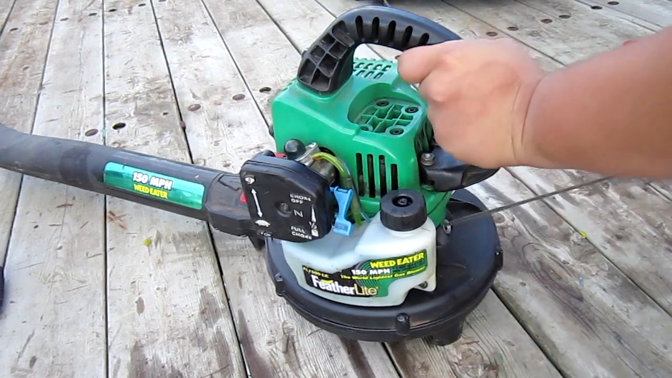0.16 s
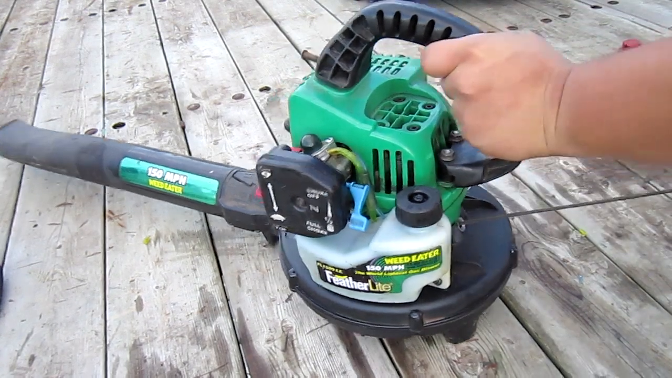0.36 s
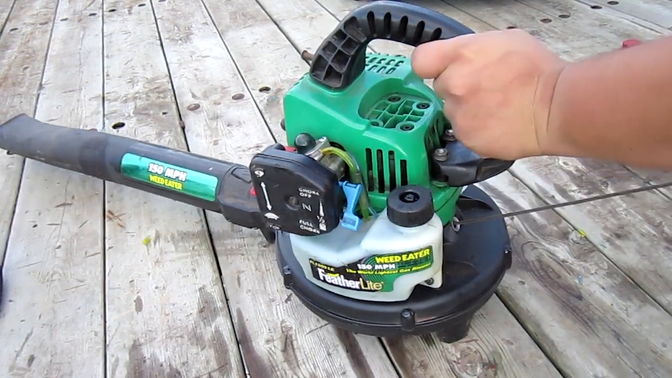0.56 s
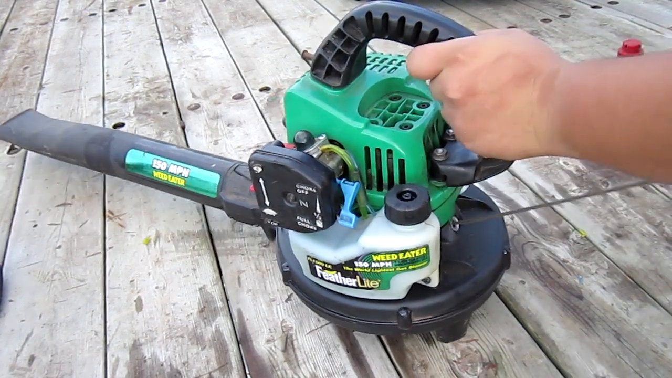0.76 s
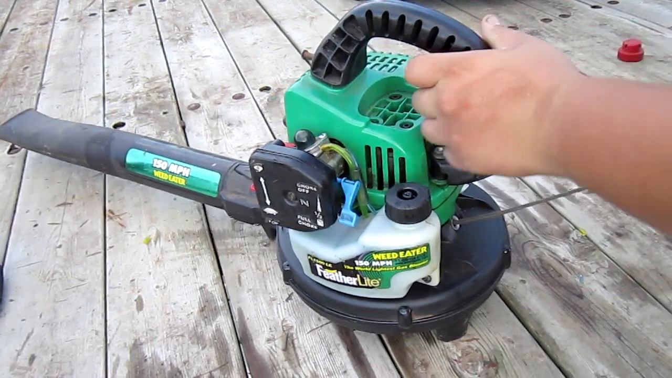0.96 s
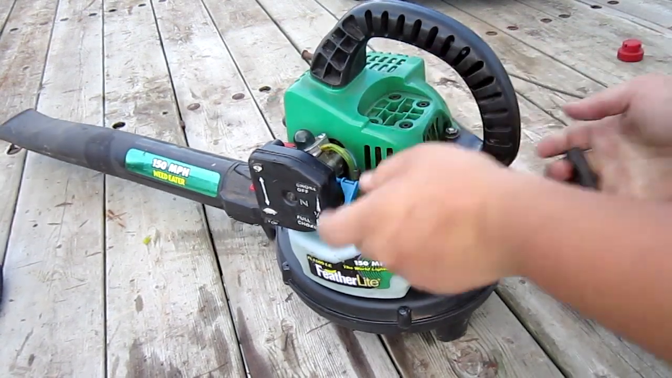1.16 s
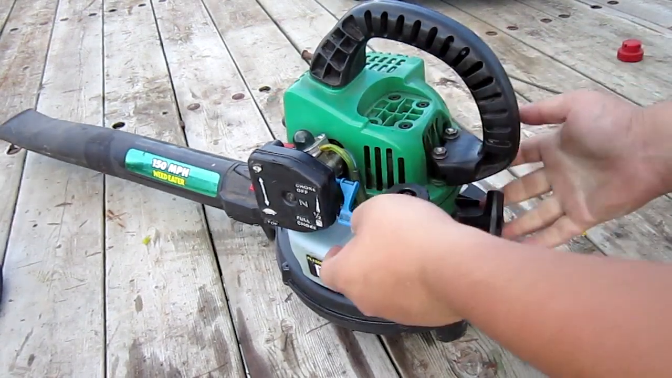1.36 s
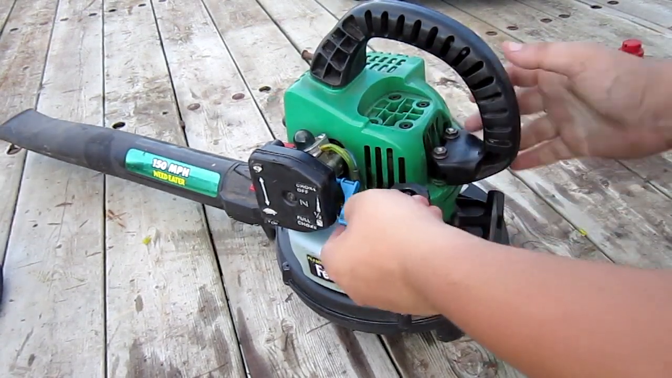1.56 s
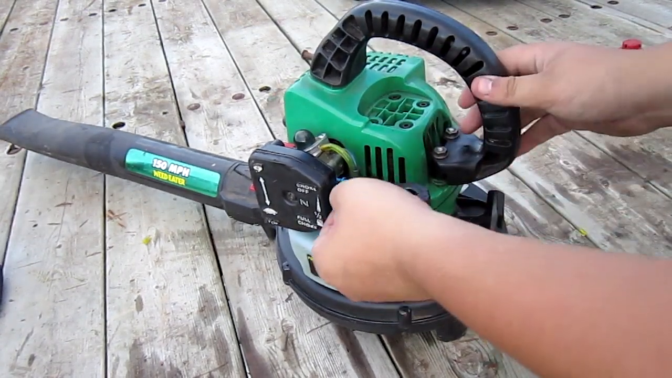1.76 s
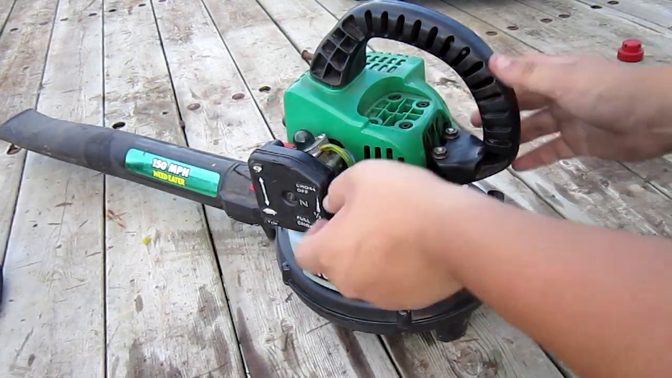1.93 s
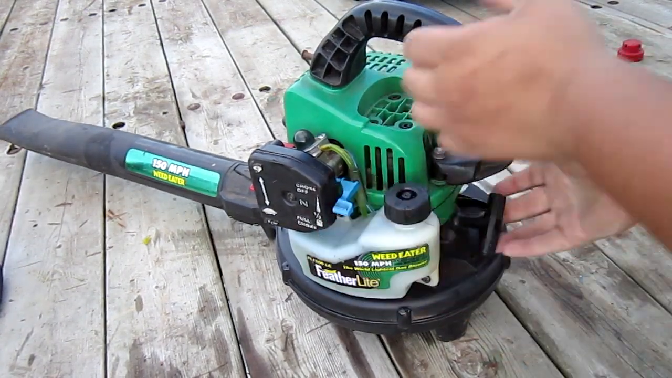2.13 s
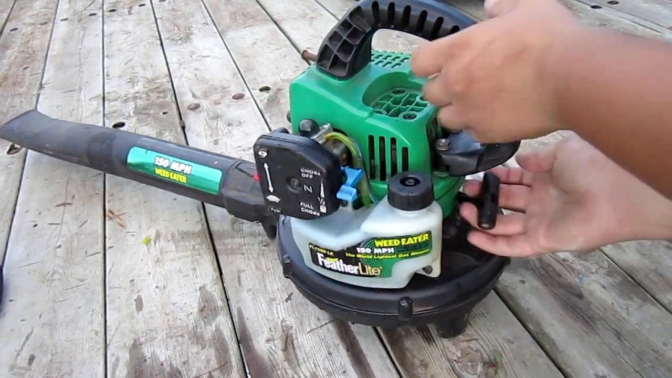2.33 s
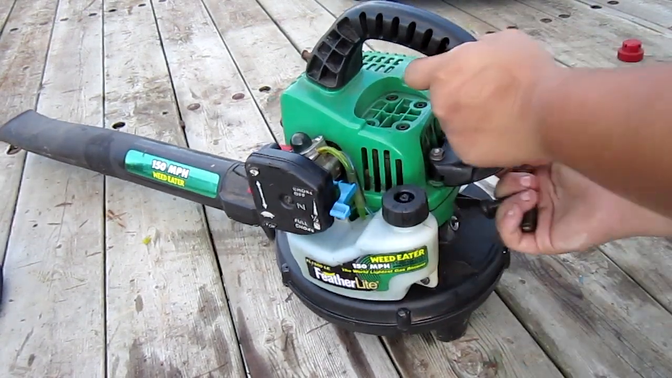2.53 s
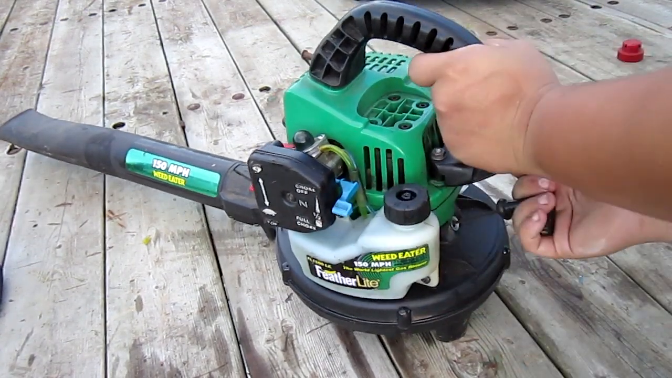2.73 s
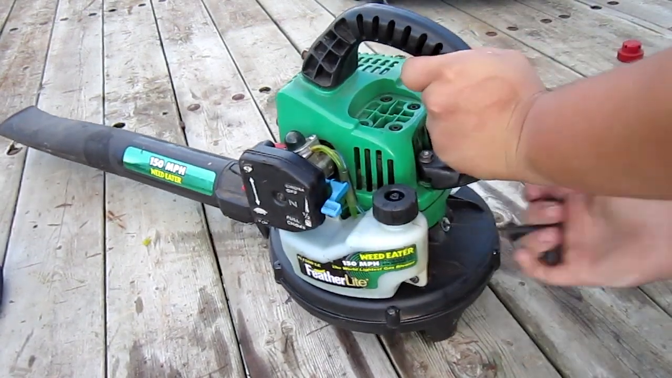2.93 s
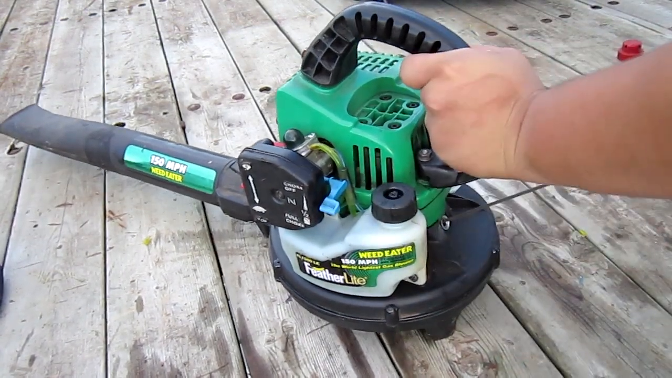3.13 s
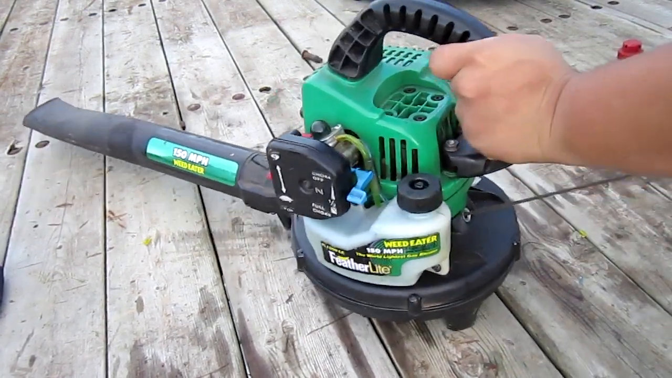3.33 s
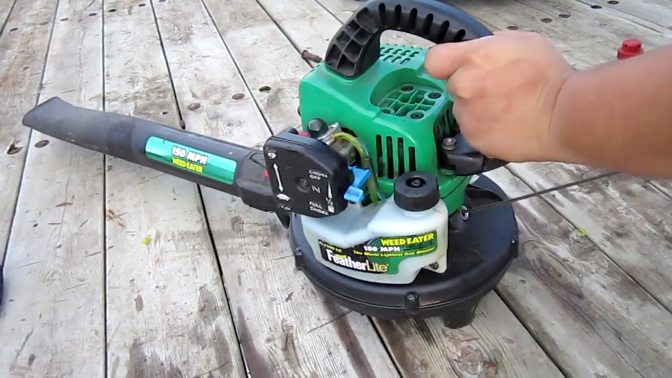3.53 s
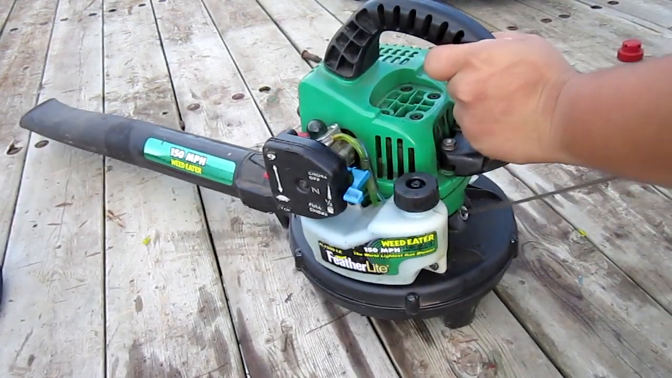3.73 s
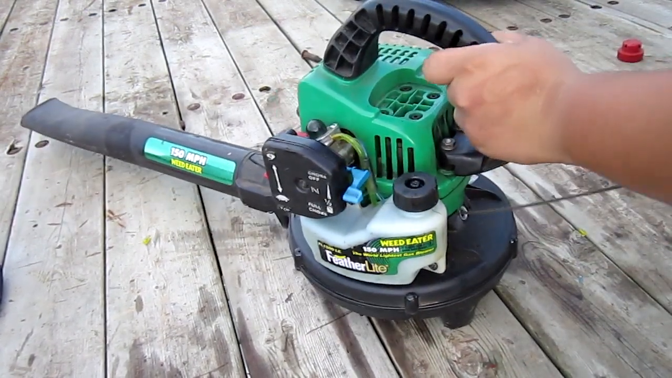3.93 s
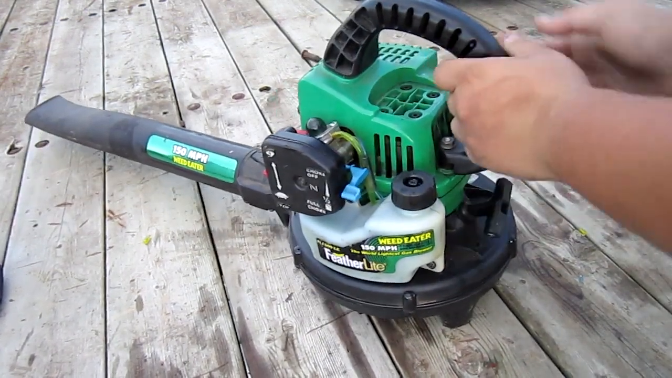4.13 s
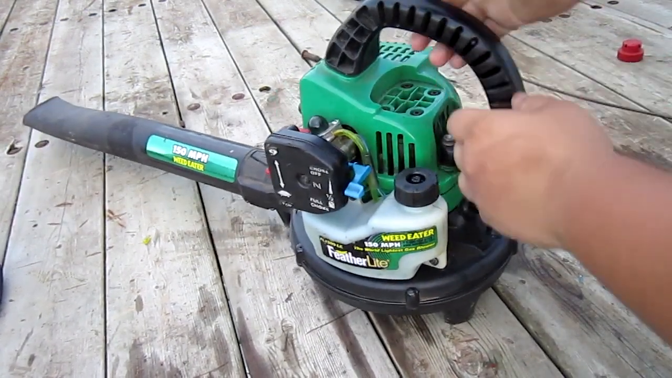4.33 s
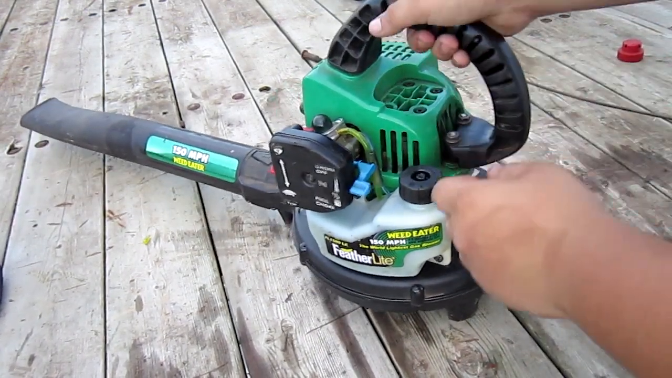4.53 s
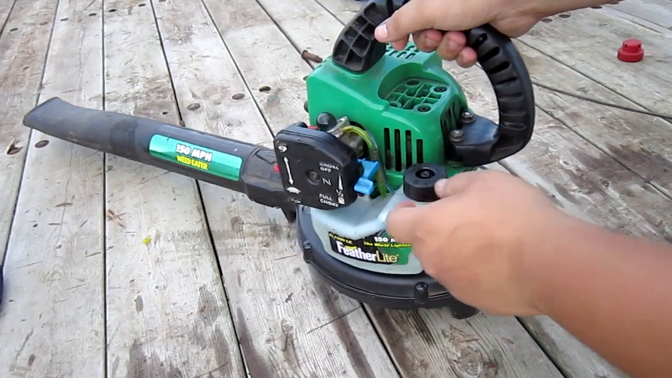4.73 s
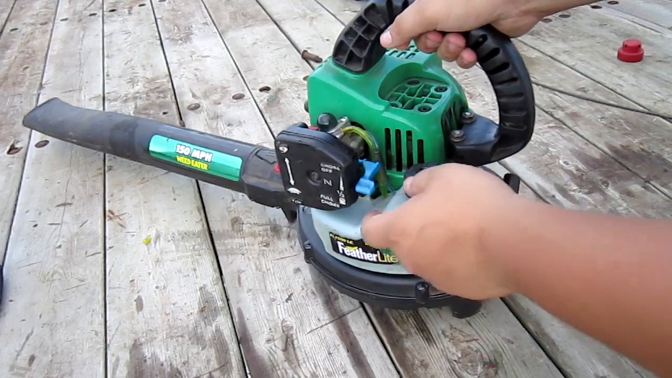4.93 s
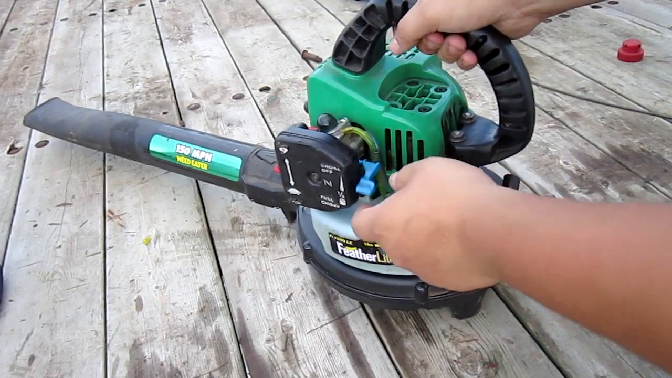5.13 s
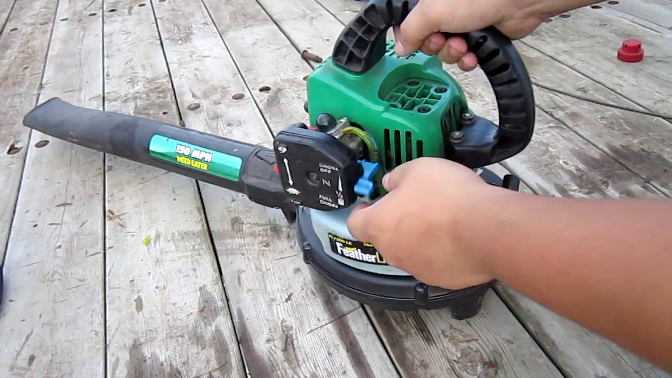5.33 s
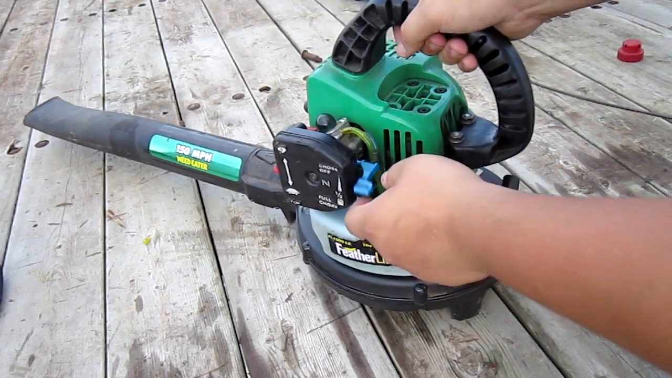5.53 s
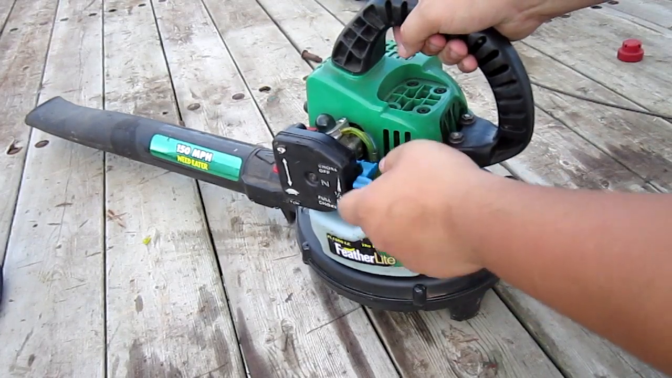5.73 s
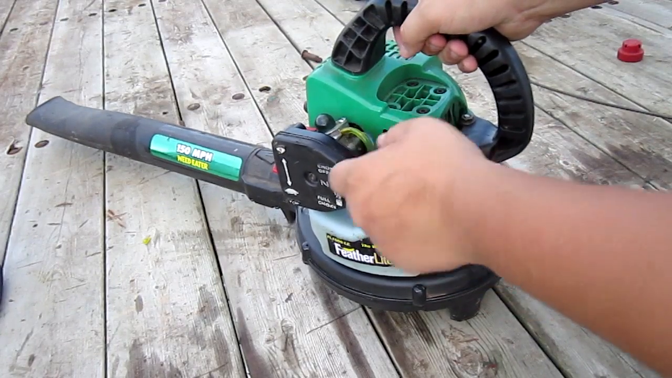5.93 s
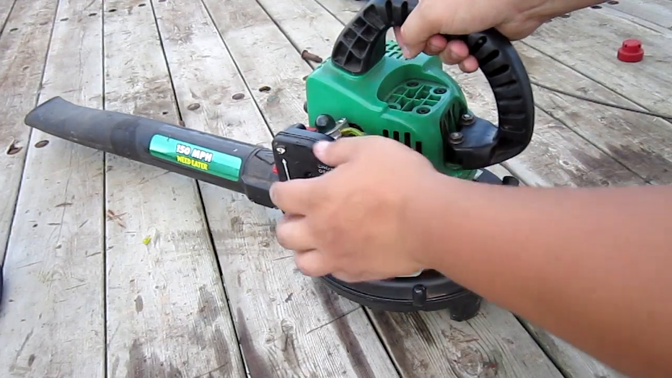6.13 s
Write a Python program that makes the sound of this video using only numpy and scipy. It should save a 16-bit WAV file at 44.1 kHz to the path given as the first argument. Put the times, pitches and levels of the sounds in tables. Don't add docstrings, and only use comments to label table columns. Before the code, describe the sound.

Close, dry mono sound on a plank deck, through a bass-light, bright, slightly gritty camera microphone. From about 0.1 to 0.35 s a cord pull makes a loud grinding rattle with jolts, then coasts down by 0.5. Pawl clicks run from 0.5 to 0.8, pause briefly, then resume at 0.9, spacing out until the handle slaps home at 1.35. Quiet follows: thin garden hiss, throbbing insects, tiny dropouts, faint falling chirps near 1.7 and 2.3. Light brushes come at 2.2, then hollow raps and knocks from 2.5 to 2.9 and a hard grip with a metallic spring ping at 2.95. A second pull at 3.0 catches; lumpy kicks and clatter stumble until 4.1. The engine then climbs quickly, settling by 4.5 into a loud raspy buzz, still rising slowly. Around 5.1 the choke opens, adding brighter fan tones and intake whistle. Light ticks near 5.7; it runs through the end at 6.3.

```python
import sys
import numpy as np
from scipy import signal
from scipy.fft import rfft, irfft
from scipy.io import wavfile
from scipy.ndimage import uniform_filter1d, map_coordinates

SR = 44100
rng = np.random.default_rng(int(sys.argv[2]) if len(sys.argv) > 2 else 0)


def to_wav(s):
    ch = np.atleast_2d(s).T
    pcm = np.round(np.clip(ch, -1, 1) * 32767)
    wavfile.write(sys.argv[1], SR, pcm.astype(np.int16))


def gain_from_db(level_db):
    decades = np.asarray(level_db, float) / 20
    return 10 ** decades


N = 277389
T = np.arange(N) / SR
CHOKE_S = 5.1

# (time [s], speed [turns/s])
SPEED = [(0, 18.6), (.34, 41.4), (.5, 30.4), (.9, 22.4), (3.0, 27), (3.2, 36.2), (3.4, 34.8), (3.55, 34.2),
         (3.63, 30), (3.65, 35.5), (3.725, 30), (3.745, 33), (3.83, 33.5), (3.87, 39.5), (3.94, 40.5),
         (3.96, 44), (4.05, 45)]
# (time [s], speed [turns/s])
CLIMB = [(4.1, 49.5), (4.29, 59), (4.45, 65), (4.58, 66.3), (4.73, 69.4), (4.8, 69.3), (4.92, 72),
         (5.07, 74.4), (5.12, 74.2), (5.2, 77), (5.39, 79.9), (5.57, 81.6), (5.63, 81.4), (5.95, 83.1),
         (6.05, 84.5), (6.29, 85.5)]
# (place in the turn [0-1], level [dB])
PORT_BEATS = [(0, -3), (.34, -2), (.57, -8)]
TURN_STARTS_S = 3.5395
# (multiple of shaft speed, catching [dB], half choked [dB], choke open [dB])
SHAFT_TONES = [(1, 17, 12, 9), (2, -2, -2, -1), (3, -8, -7, -5), (4, -11, -9, -10), (5, -12, -9, -3),
               (6, -11, -8, -9), (7, -5, 2, -2), (8, -14, -13, -13), (9, -12, -13, -2), (10, -13, -10, -1),
               (11, -7, -1, 2), (12, -4, -5, -2), (13, -3, -4, -4), (14, 5, 6, 5), (15, -9, -10, -7),
               (16, -9, -8, -9), (17, -2, -3, -9), (18, -10, -9, -10)]
TONES_DB, TONE_WOBBLE_DB = .6, 1.05

# (time [s], level [dB])
FIRST_PULL = [(0.076, -58), (0.084, -35), (.11, -28), (.12, -26), (.153, -18), (.17, -20.5), (.251, -19.5),
              (0.337, -19.5)]
COAST = [(.345, -31), (.485, -30.5)]
REWIND = [(.5, -36), (.52, -43.5), (.6, -42), (0.684, -36.5), (.787, -40)]
SLACK = [(.795, -54), (.885, -57.5), (0.897, -38)]
SECOND_PULL = [(2.98, -37), (2.995, -42.5), (3.043, -16), (3.056, -19), (3.072, -19), (3.261, -24)]
STUMBLE = [(3.281, -28.5), (3.35, -29), (3.646, -32.5), (3.923, -29), (4.099, -21.5)]
RUN = [(4.12, -29), (4.289, -18.5), (4.45, -18), (5.09, -18), (5.63, -18.5), (6.29, -18)]
# (rasp at start [dB], at end [dB], hiss at start [dB], at end [dB], loose shaking [0-1])
STAGE_TONE = [
    (-4, -8, -12.5, -18.5, 0.99),
    (-10, -7.5, -12, -40, 1),
    (-5.5, 11.5, -7, 8.5, 0.98),
    (-2, 8.5, -20, -32, 0.74),
    (-3.5, -11, -17, -18.5, 0.99),
    (-8.5, -5.5, -32, -11.5, 0.82),
    (-11.5, -12.5, -20, -18.5, 0.81),
]
# (time [s], level [dB])
LIT = [(4.1649, -37), (4.2168, -34), (4.2677, -30), (4.3166, -33), (4.3635, -35), (4.4104, -32),
       (4.4548, -30), (4.4992, -33), (4.5436, -28), (4.589, -30), (4.6319, -28), (4.6753, -28),
       (4.7172, -31), (4.7601, -29), (4.8035, -29), (4.8474, -32), (4.8863, -34), (4.9152, -30),
       (4.9566, -32), (4.9965, -32), (5.037, -35), (5.0764, -34), (5.1178, -30), (5.1492, -34),
       (5.1836, -29), (5.222, -33), (5.2739, -31), (5.3118, -32), (5.3617, -31), (5.4001, -32),
       (5.4365, -32), (5.4745, -29), (5.5064, -36), (5.5363, -31), (5.5722, -33), (5.6151, -34),
       (5.6461, -32), (5.6835, -31), (5.7493, -33), (5.7927, -34), (5.8242, -40), (5.8656, -33),
       (5.9264, -28), (5.9614, -37), (5.9978, -33), (6.0337, -29), (6.0641, -37), (6.1045, -30),
       (6.1399, -32), (6.1734, -37), (6.2103, -32), (6.2572, -29)]
BURST_DB, BURST_RISE_S, BURST_S = 21, .001, .0033

# (frequency [Hz], gain [dB])
HOUSING = [(24, -61), (40, -51.5), (70, -20.5), (107, -15.5), (152, -9.5), (189, -5.5), (333, 1), (395, 2),
           (524, -1), (674, -7.5), (788, -0.5), (937, -4), (1150, -6.5), (1240, -9), (1700, -9),
           (2210, -50), (3740, -120)]
# (frequency [Hz], gain [dB])
RASP = [(710, -15), (1200, -11.5), (1770, 11), (2360, 2.5), (2870, -2.5), (3240, -27.5), (3550, -0.5),
        (3800, -25), (4940, -33), (8360, -120)]
# (frequency [Hz], gain [dB])
HISS = [(1760, -15), (3000, 0), (3240, 0.5), (3560, -16), (3950, 0.5), (5180, -5), (5920, -11),
        (9000, -24.5)]
# (frequency [Hz], width [Hz], level [dB])
PORT = [(1033, 330, 0), (179, 53, -1)]
# (frequency [Hz], width [Hz], level [dB])
MUFFLER = [(2060, 520, -6.5), (3467, 270, 6.5), (4580, 1400, -5.5), (5260, 350, -0.5)]
# (frequency [Hz], width [Hz], level [dB])
INTAKE = [(2880, 280, 0)]

# (frequency [Hz], width [Hz], level [dB])
THUD = [(191, 57, -11), (374.7, 32, -3.5), (669, 402, -1.5), (812, 950, -4.5), (1117, 220, -4)]
CRACK = [(1530, 1080, 22.5), (2230, 740, 24.5), (2350, 52, 17.5), (3130, 1700, 15.5)]
TICK = [(4160, 440, 10.5), (5560, 980, 12), (5650, 1200, 7)]
PAWL_RING = [(4090, 110, 3), (4490, 96, 0.5), (5730, 120, 4)]
BOOM = [(167, 24, 1.5), (215.3, 5.3, 4.5), (369, 56, 6), (535, 460, -5.5), (700, 88, -2), (1030, 140, -10),
        (1270, 690, -17.5)]
RIM = [(370, 65, -4), (515, 150, 1.5), (785, 530, -4.5), (1430, 820, -6)]
SEAT = [(383, 64, 1.5), (707, 140, 1), (1130, 91, 0), (1460, 150, -4.5)]

# (time [s], crack level [dB], thud against crack [dB])
FIRINGS = [
    (3.041, -24.5, 17),
    (3.2026, -22, 8.5),
    (3.3475, -22.5, 10.5),
    (3.465, -24.5, 6.5),
    (3.6421, -23.5, 9.5),
    (3.7328, -23, 8.5),
    (3.8775, -24, 13.5),
    (4.0426, -23, -18),
    (4.0971, -20, 1),
]
MISFIRES = [(3.026, -24, 17), (3.0741, -20.5, 16.5), (3.288, -27, 11), (3.306, -27, 17),
            (3.3239, -23.5, 2.2), (3.375, -29, 8.8), (3.402, -32, 3.5), (3.432, -25, 2.4), (3.49, -31, 6.8),
            (3.519, -24, 2), (3.549, -28.5, 8), (3.578, -22.5, 8.6), (3.609, -23, 4.1), (3.701, -27.5, 5.5),
            (3.765, -41, 7), (3.793, -47, 6.6), (3.824, -26, 6), (3.853, -28, 7.8), (3.927, -25.5, 8),
            (3.9529, -20.5, 11.7), (4.0, -22, 13), (4.025, -20.5, 6.3), (4.07, -32.5, 9.1),
            (4.134, -54.5, 8), (4.162, -23.5, 6)]
JOLTS = [(.085, -34.5, 8), (.136, -34, 23.5), (.186, -24.5, 9.5), (.211, -29.5, 6), (.23, -29.5, -6),
         (.246, -22, 0), (.261, -23, 11), (.29, -30.5, 21), (.309, -34, 3), (.324, -19.5, 3), (.41, -40, 6),
         (.439, -43, -2), (3.009, -28.5, 11), (3.097, -25, 5.5), (3.118, -23.5, 8.5), (3.133, -24.5, 8),
         (3.147, -23.5, 11), (3.177, -30, 14), (3.21, -26, 3.5), (3.225, -41, 3), (3.251, -26.5, 1.5),
         (3.267, -35, 15.5)]
RATCHET = [(0.494, -23.5, 1.5), (0.5312, -24, -3), (0.5684, -22, 0.5), (.603, -22.5, -1), (.64, -23.5, -2),
           (0.6739, -25, 5.5), (.7, -42.5, 9.5), (0.7094, -25.5, 4), (0.734, -32.5, 2), (.748, -32.5, -7),
           (0.7645, -27, 1.5), (0.7806, -35.5, 3), (0.9111, -24, -5.5), (0.9374, -21, -4),
           (0.9632, -24, -5.5), (0.988, -22, -12), (1.0186, -25, -2.5), (1.048, -23.5, -8),
           (1.0812, -25.5, -2), (1.117, -21.5, -6.5), (1.1712, -21, -4), (1.2463, -20.5, -6.5),
           (1.33, -21.5, -7)]
HANDLE_HOME = [
    (1.3525, -19.5, 6.9),
]
BUMPS = [
    (1.646, -64, 18),
    (.1466, -18, 11),
    (.3792, -27, 10),
    (.4314, -50, 3),
    (.468, -53, -3),
    (.8087, -27.5, -4),
    (.847, -30.5, 0.5),
    (.8975, -34, 6),
    (1.2774, -60, 29),
]
KNOCKS = [
    (0.1181, -34, 22.6),
    (2.5473, -46, 35),
    (2.6593, -22, 2.4),
    (2.9705, -40.5, 19),
]
RAPS = [
    (2.5281, -23, 4.6),
    (2.7716, -30.5, 13),
    (2.8487, -26.5, 14.2),
    (2.9171, -22.5, 11.5),
]
BRUSHES = [
    (1.775, -51.5, 8),
    (2.19, -45, 8),
    (2.222, -34, -0.5),
    (2.428, -56.5, 17.5),
    (2.614, -26.5, 5.5),
    (2.718, -48.5, 23),
    (2.803, -46.5, 25.5),
    (2.905, -44, 27),
    (2.953, -17, 2),
]
RATTLES = [
    (5.703, -33, -13),
    (5.739, -25, -11),
]
SLACK_S = .85

# (time [s], level [dB], frequency [Hz], t60 [s])
SPRING = [
    (.965, -49, 5400, .1),
    (1.251, -46, 5600, .08),
    (2.959, -30, 5879, .085),
    (2.958, -40, 5674, .07),
    (2.96, -40, 4048, .16),
]
# (time [s], level [dB])
CHIRPS = [
    (1.695, -51),
    (1.745, -52),
    (1.797, -52),
    (2.258, -54),
    (2.306, -51),
    (2.354, -48),
]
CHIRP_HZ, CHIRP_FALL_HZ, CHIRP_S = 4600, 330, .032
# (frequency [Hz], gain [dB])
AIR = [(130, -2), (230, -2), (390, -3.5), (900, -8.5), (2400, -15.5), (4000, -21.5), (5000, -24.5),
       (5900, -31.5)]
# (frequency [Hz], gain [dB])
BREEZE = [(60, -15.5), (200, -3.0), (700, -14.5), (1500, -24.0)]
# (frequency [Hz], gain [dB])
WIND = [(20, -0.5), (60, -4.5), (130, -7.5), (250, -37.5)]
# (peak time [s], level [dB], swell [dB/s], fade [dB/s])
GUSTS = [
    (.11, -51.5, 166, 37),
    (.62, -59.5, 41, 49),
    (2.0, -70, 33, 20),
    (3.301, -54, 10.5, 4),
    (4.04, -50.5, 51, 51),
    (4.3, -59.5, 31, 7),
]
# (frequency [Hz], width [Hz], level [dB])
INSECTS = [(5250, 470, 0)]
INSECT_THROB_HZ = 46.04
# (time [s], level [dB])
GAIN = [(0, -47.5), (.15, -37.5), (.62, -37), (.73, -48.5), (1.25, -44), (1.4, -47), (1.45, -54.5),
        (1.67, -54.5), (1.7, -52.5), (2.1, -47.5), (2.6, -40.5), (2.89, -41.5), (3.04, -34.5)]
# (frequency [Hz], gain [dB])
DECK = [(100, -14.5), (1000, 17), (8000, 14.0)]
# (start [s], end [s])
SHUT = [(1.463, 1.476), (1.483, 1.512), (1.544, 1.551), (1.571, 1.577), (1.587, 1.595), (1.609, 1.626),
        (1.632, 1.641), (1.652, 1.659), (1.663, 1.669), (1.674, 1.68)]
CAMERA_HZ, STEPS, OFFSET = 12000, 128, .00115


def unit(x):
    return x / np.sqrt(np.mean(x ** 2))


def colour(x, points):
    hz, db = np.transpose(points)
    size = 4096
    log_hz = np.log(np.fft.rfftfreq(size, 1 / SR) + 1)
    gain_db = np.interp(log_hz, np.log(hz), db, left=db[0] - 27, right=db[-1] - 23)
    ceps = irfft(np.log(gain_from_db(gain_db)))
    ceps[1:size // 2] *= 2
    ceps[size // 2 + 1:] = 0
    taps = irfft(np.exp(rfft(ceps)))
    return signal.oaconvolve(x, taps / np.sqrt(np.sum(taps ** 2)))[:N]


def ring(x, peaks):
    click = signal.unit_impulse(4096)
    taps = np.zeros(4096)
    for k, (hz, width, db) in enumerate(peaks):
        taps += (-1) ** k * gain_from_db(db) * signal.lfilter(*signal.iirpeak(hz, hz / width, SR), click)
    return signal.oaconvolve(x, taps / np.sqrt(np.sum(taps ** 2)))[:N]


def walk(rate):
    k = int(SR / rate)
    held = np.repeat(rng.standard_normal(N // k + 1), k)
    return 2 * uniform_filter1d(uniform_filter1d(held, k), k)[:N]


def pulses(turns, scatter_db, jitter):
    at = np.flatnonzero(np.diff(np.floor(turns)))
    spacing = np.gradient(at)
    late, size = rng.standard_normal((2, len(at)))
    moved = np.clip(at + (jitter * spacing * late).astype(int), 0, N - 1)
    out = np.zeros(N)
    np.add.at(out, moved, gain_from_db(scatter_db * size))
    speed = np.gradient(turns) * SR
    return out * np.sqrt(SR / np.maximum(speed, 1))


def engine():
    turns = np.cumsum(np.interp(T, *np.transpose([*SPEED, *CLIMB]))) / SR
    turns = turns - turns[int(TURN_STARTS_S * SR)]
    buzz_db, rasp_db, hiss_db, loose = stages()
    running = np.interp(T, [4.08, 4.26], [0, 1])
    opened = np.interp(T, [CHOKE_S - .08, CHOKE_S + .15], [0, 1])

    beats = np.zeros(N)
    for place, db in PORT_BEATS:
        beats += gain_from_db(db) * pulses(turns - place, scatter_db=1.5, jitter=.012)
    beats = -gain_from_db(-9 * running) * ring(beats, PORT)
    clatter = unit(rng.standard_normal(N) * gain_from_db(.92 * walk(200)))
    buzz = colour(np.sqrt(1 - loose) * beats + np.sqrt(loose) * clatter, HOUSING)
    tones = shaft_tones(turns, opened)
    buzz += gain_from_db(TONES_DB) * running * unit(colour(tones, HOUSING))

    puff = .6 + .9 * np.exp(-(2 * turns % 1) / .4) * gain_from_db(1.5 * walk(70))
    rasp = colour(unit(puff * clatter + .16 * beats), RASP)
    hiss = colour(unit(puff * rng.standard_normal(N) * gain_from_db(1.6 * walk(200))), HISS)
    burst = lit_bursts() * (1 - .45 * opened)
    rasp *= 1 + .35 * burst
    hiss += ring(burst * rng.standard_normal(N), MUFFLER)
    hiss += gain_from_db(-2) * opened * ring(puff * rng.standard_normal(N), INTAKE)
    return gain_from_db(buzz_db) * buzz + gain_from_db(rasp_db) * rasp + gain_from_db(hiss_db) * hiss


def stages():
    def still(s):
        return s, -90, -90, -90, 0

    curves = [FIRST_PULL, COAST, REWIND, SLACK, SECOND_PULL, STUMBLE, RUN]
    rows = [still(0)]
    for curve, (rasp0, rasp1, hiss0, hiss1, loose) in zip(curves, STAGE_TONE):
        start, end = curve[0][0], curve[-1][0]
        for s, db in curve:
            done = (s - start) / (end - start)
            rasp_db = db + rasp0 + done * (rasp1 - rasp0)
            hiss_db = db + hiss0 + done * (hiss1 - hiss0)
            rows.append((s, db, rasp_db, hiss_db, loose))
        if curve is SLACK:
            rows += [still(.93), still(2.95)]
    times, *levels = np.array(rows).T
    return [np.interp(T, times, level) for level in levels]


def shaft_tones(turns, opened):
    catching = np.interp(T, [4.3, 4.6], [1, 0])
    uneven = turns + .007 * walk(22)
    tones = np.zeros(N)
    for k, catch_db, rich_db, lean_db in SHAFT_TONES:
        level_db = rich_db + catching * (catch_db - rich_db) + opened * (lean_db - rich_db)
        level_db = level_db + TONE_WOBBLE_DB * min(k / 4, 1) * walk(30)
        drift = .4 * k ** 2 + .013 * (k + 10) * walk(20)
        tones += gain_from_db(level_db) * np.cos(2 * np.pi * k * uneven + drift)
    return tones


def lit_bursts():
    at, db = np.transpose(LIT)
    last = np.maximum(np.searchsorted(at, T) - 1, 0)
    age = np.maximum(T - at[last] + BURST_RISE_S, 0) * (T > at[0])
    return gain_from_db(BURST_DB + db[last] / 2) * age / BURST_RISE_S * np.exp(-age / BURST_S)


def blows(table, shell, tick_db, t60, snap, rise_s, linger, trim_db):
    shake = np.zeros((3, N))
    age = np.arange(SR // 6) / SR
    t60s = t60 * np.array([[linger], [1], [.8]])
    envelope = np.exp(-np.log(1000) * age / t60s) * np.minimum(age / rise_s, 1)
    for s, db, thud_db in table:
        chatter = rng.standard_normal((3, len(age))) * envelope
        chatter[:, 0] += snap
        part_db = np.array([[thud_db], [0], [tick_db]])
        start = int(s * SR)
        shake[:, start:start + len(age)] += chatter * gain_from_db(db + trim_db + part_db)
    dull = signal.sosfilt(signal.butter(2, 1500, fs=SR, output="sos"), shake[0])
    heard = ring(dull, shell) + ring(shake[1], CRACK) + ring(shake[2], TICK)
    return signal.sosfilt(signal.butter(2, [140, 6500], "band", fs=SR, output="sos"), heard)


def ignition():
    out = blows(FIRINGS, THUD, tick_db=-8.5, t60=.049, snap=4, rise_s=.0015, linger=.86, trim_db=4.5)
    out += blows(MISFIRES, THUD, tick_db=-19, t60=.04, snap=.5, rise_s=.004, linger=.74, trim_db=4)
    return out + blows(RATTLES, THUD, tick_db=6, t60=.012, snap=3, rise_s=.0005, linger=1, trim_db=0)


def starter():
    out = blows(JOLTS, THUD, tick_db=-13.5, t60=.03, snap=3.7, rise_s=.0023, linger=.73, trim_db=7.5)
    out += blows(RATCHET, THUD, tick_db=-1.5, t60=.055, snap=0, rise_s=.0035, linger=1.6, trim_db=3)
    out += blows(HANDLE_HOME, SEAT, tick_db=-5, t60=.034, snap=5.8, rise_s=.0014, linger=1.5, trim_db=4.5)
    return out + pawl_ring()


def pawl_ring():
    hits = np.zeros(N)
    age = np.arange(SR // 20) / SR
    for s, db, _ in RATCHET:
        ring_db = db - 14 if s < SLACK_S else db - 26.5
        start = int(s * SR)
        hits[start:start + len(age)] += gain_from_db(ring_db) * rng.standard_normal(len(age)) * np.exp(-age / .02)
    return ring(hits, PAWL_RING)


def handling():
    out = blows(BUMPS, THUD, tick_db=-38, t60=.028, snap=1.6, rise_s=.0029, linger=1.3, trim_db=5)
    out += blows(KNOCKS, BOOM, tick_db=-19, t60=.028, snap=12, rise_s=.0007, linger=2.1, trim_db=-1.5)
    out += blows(RAPS, RIM, tick_db=-19, t60=.024, snap=16, rise_s=.0007, linger=1.8, trim_db=0)
    return out + blows(BRUSHES, BOOM, tick_db=-11, t60=.065, snap=0, rise_s=.0013, linger=4.8, trim_db=-2)


def recoil_spring():
    out = np.zeros(N)
    for s, db, hz, t60 in SPRING:
        age = np.maximum(T - s, 0)
        out += gain_from_db(db) * np.sin(2 * np.pi * hz * age) * np.exp(-np.log(1000) * age / t60)
    return out


def deck_scatter(near):
    age = np.arange(SR // 5) / SR
    tail = rng.standard_normal(len(age)) * np.exp(-np.log(1000) * age / .56) * (age > .003)
    return gain_from_db(-72) * colour(signal.fftconvolve(near, tail)[:N], DECK)


def bird():
    out = np.zeros(N)
    for s, db in CHIRPS:
        age = np.clip((T - s) / CHIRP_S, 0, 1)
        phase = 2 * np.pi * CHIRP_S * age * (CHIRP_HZ - CHIRP_FALL_HZ * age / 2)
        out += gain_from_db(db) * np.sin(np.pi * age) * np.sin(phase)
    return out


def garden():
    level_db = np.interp(T, *np.transpose(GAIN))
    air = colour(rng.standard_normal(N), AIR) * gain_from_db(.8 * walk(23))
    breeze = colour(rng.standard_normal(N), BREEZE) * gain_from_db(-6 + 2.9 * walk(29.926))
    throb = 1 + np.sin(2 * np.pi * INSECT_THROB_HZ * T + walk(8.1))
    insects = gain_from_db(-14) * ring(throb * rng.standard_normal(N), INSECTS)
    gusts = [db - np.where(T < s, swell * (s - T), fade * (T - s)) for s, db, swell, fade in GUSTS]
    wind_db = np.max(gusts, axis=0) + 20 + 2 * walk(10)
    wind = colour(rng.standard_normal(N), WIND) * gain_from_db(wind_db)
    return gain_from_db(level_db) * (air + breeze + insects) + wind


def scene():
    near = engine() + ignition() + starter() + handling()
    mix = near + deck_scatter(near) + recoil_spring() + bird() + garden()
    return mix[None]


def band_limit(x):
    return signal.sosfilt(signal.butter(12, 13700, fs=SR, output="sos"), x)


def record(dry):
    x = signal.sosfilt(signal.butter(2, 90, "high", fs=SR, output="sos"), dry[0])
    x = x - 1.4 * np.convolve(x, [1, -2, 1], "same")
    x = signal.sosfilt(signal.ellip(8, .3, 60, 6200, fs=SR, output="sos"), x)
    shut = np.any([(T > a) & (T < b) for a, b in SHUT], axis=0)
    x = np.tanh(1.1 * x * np.where(shut, gain_from_db(-20), 1)) / 1.75
    slow_at = np.arange(N * CAMERA_HZ // SR + 1) * SR / CAMERA_HZ
    slow = map_coordinates(x, [slow_at], mode="nearest")
    slow = np.round((slow + OFFSET) * STEPS) / STEPS
    slow = np.convolve(slow, [.1, .8, .1], "same")
    mix = map_coordinates(slow, [T * CAMERA_HZ], mode="nearest")[None]
    return band_limit(mix)


dry = scene()
out = record(dry)
to_wav(out)
```